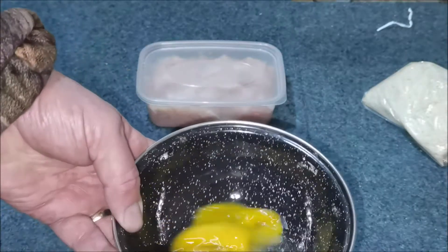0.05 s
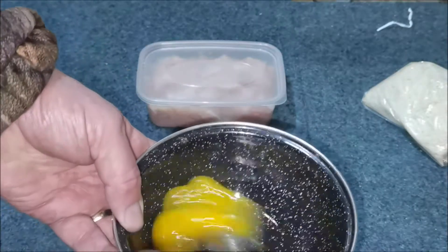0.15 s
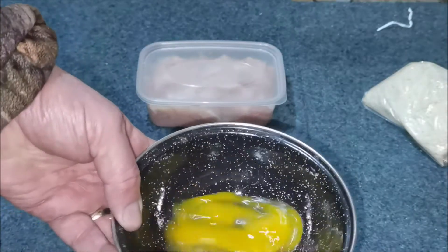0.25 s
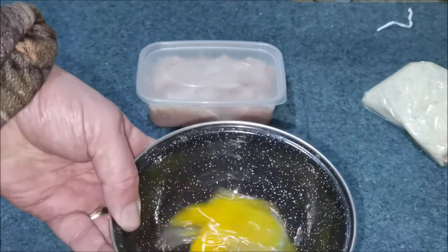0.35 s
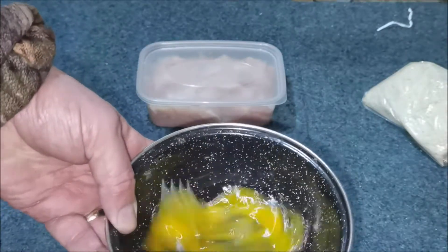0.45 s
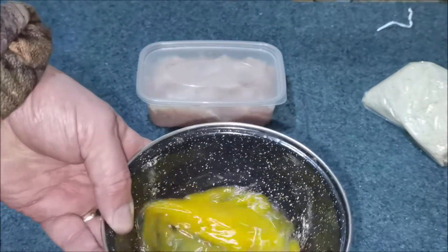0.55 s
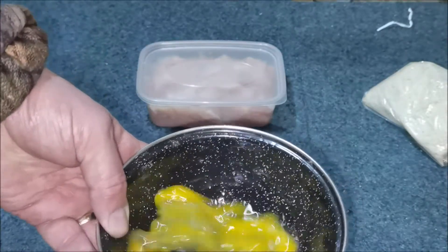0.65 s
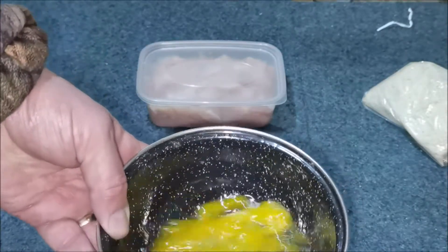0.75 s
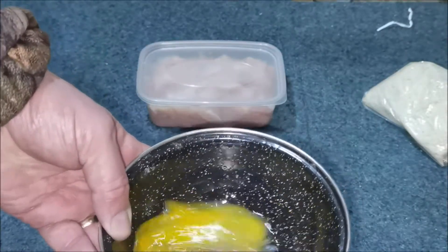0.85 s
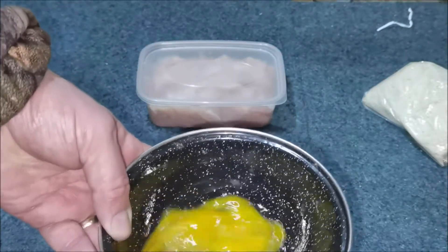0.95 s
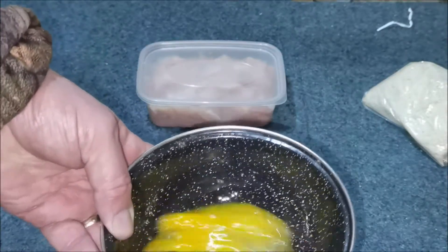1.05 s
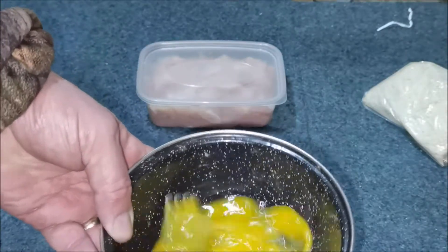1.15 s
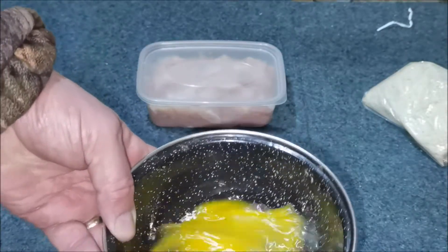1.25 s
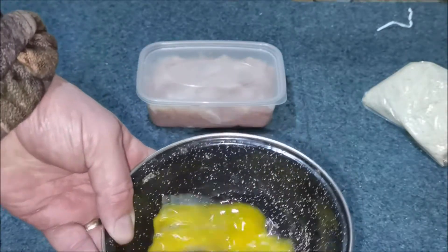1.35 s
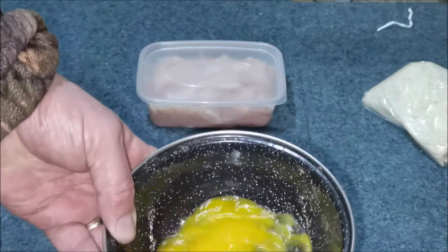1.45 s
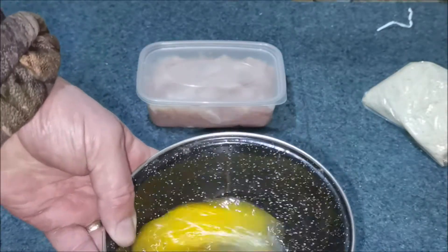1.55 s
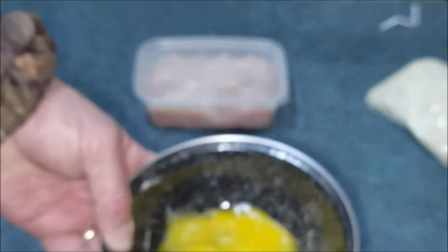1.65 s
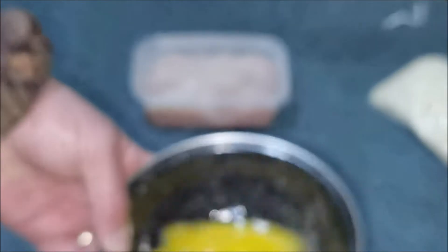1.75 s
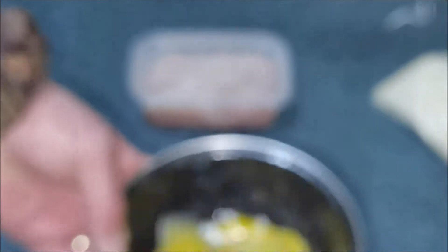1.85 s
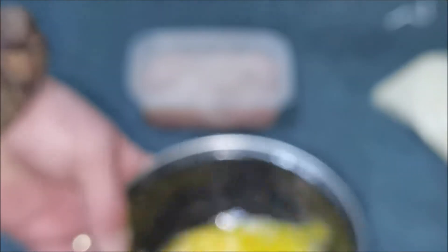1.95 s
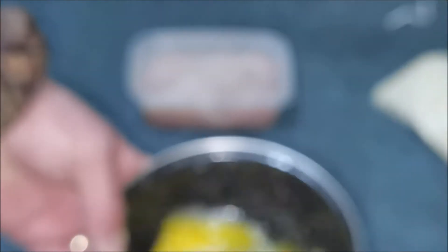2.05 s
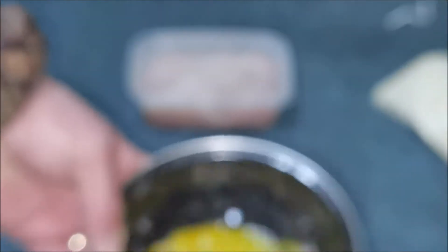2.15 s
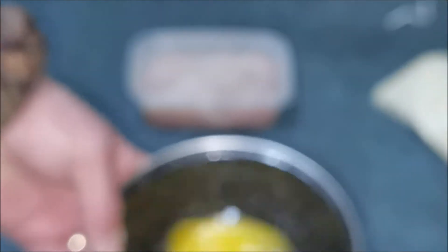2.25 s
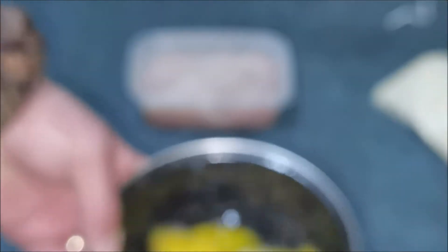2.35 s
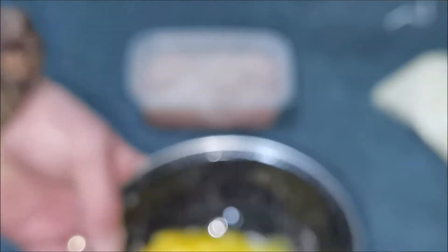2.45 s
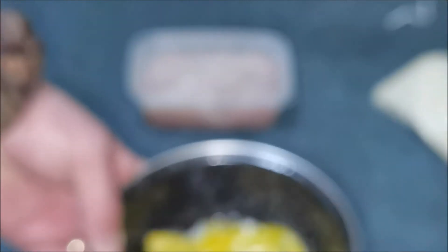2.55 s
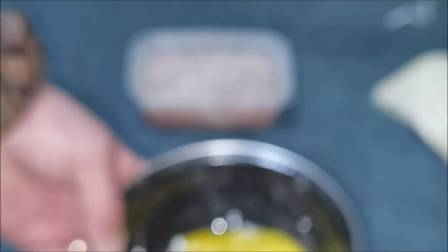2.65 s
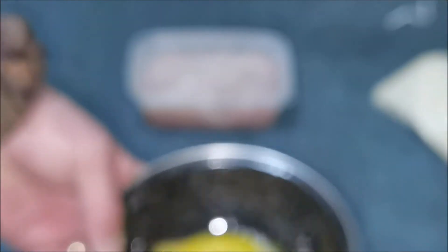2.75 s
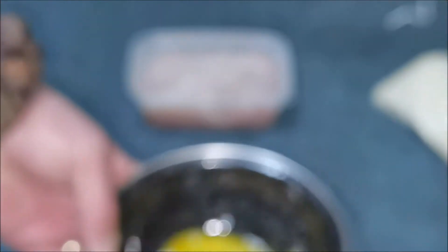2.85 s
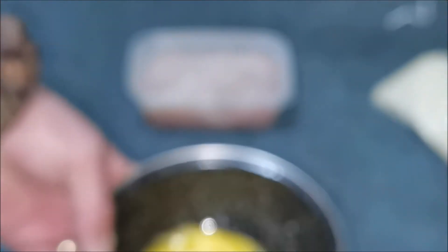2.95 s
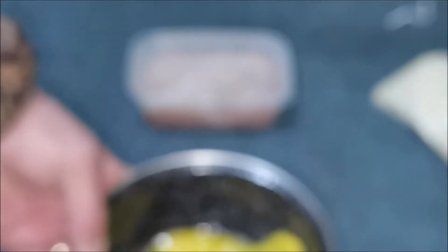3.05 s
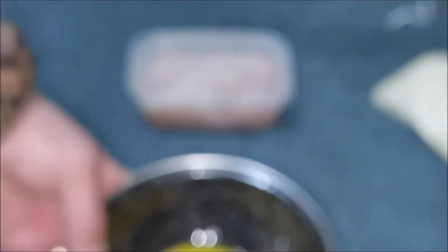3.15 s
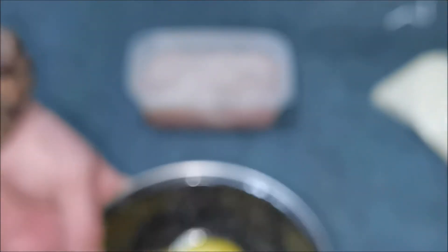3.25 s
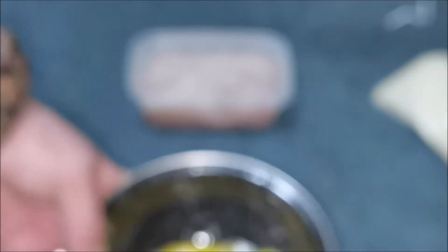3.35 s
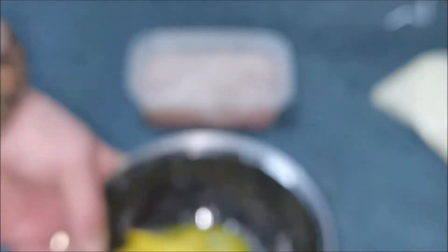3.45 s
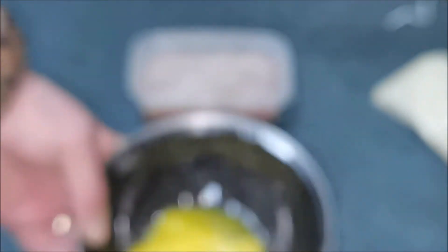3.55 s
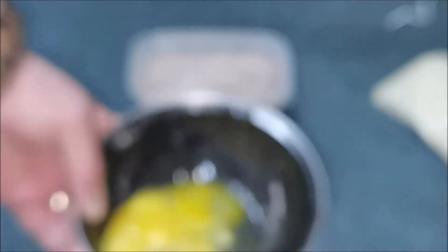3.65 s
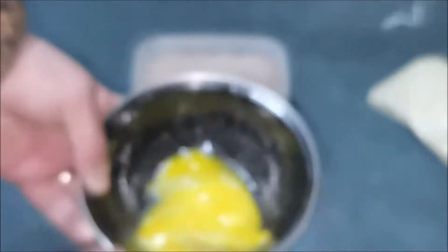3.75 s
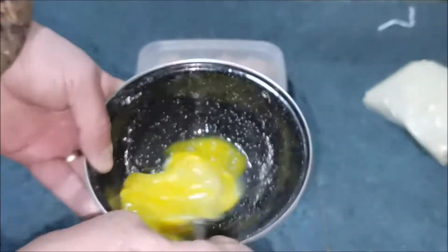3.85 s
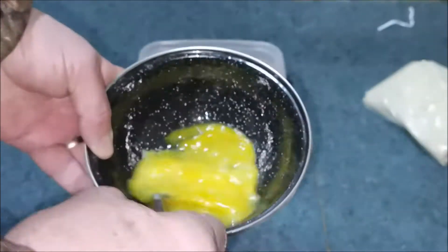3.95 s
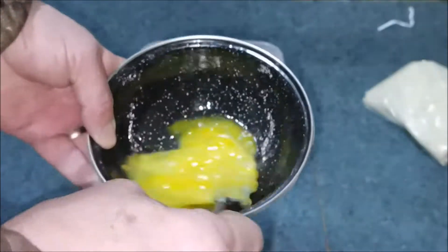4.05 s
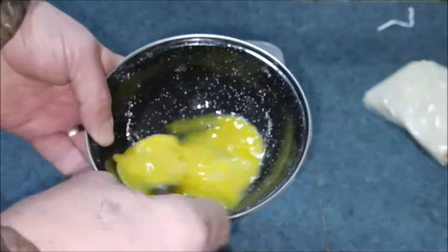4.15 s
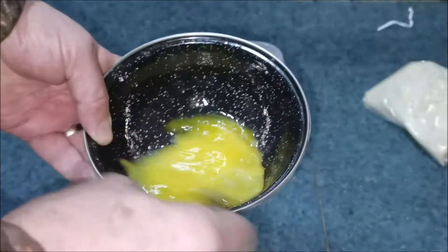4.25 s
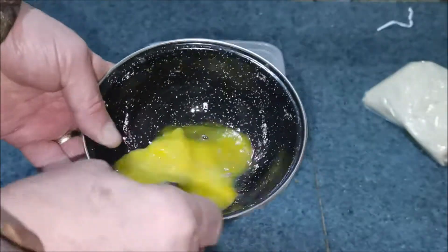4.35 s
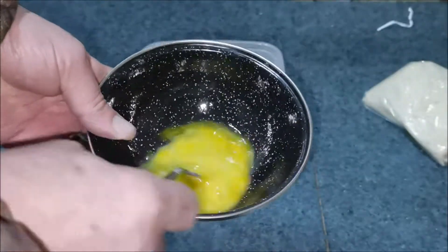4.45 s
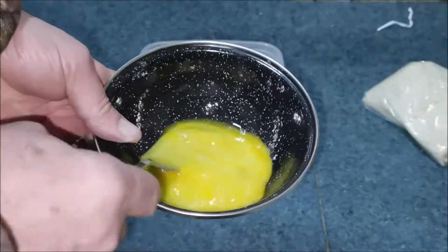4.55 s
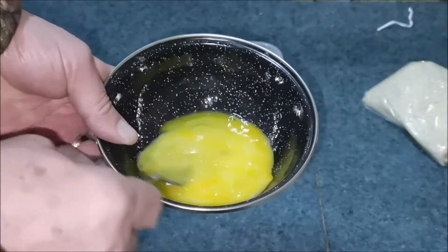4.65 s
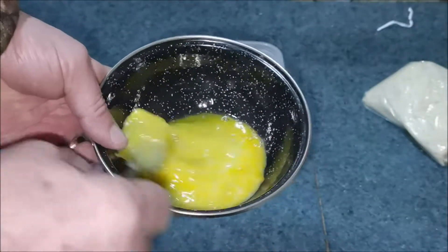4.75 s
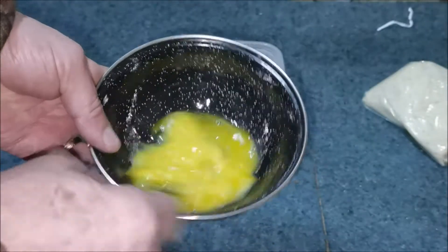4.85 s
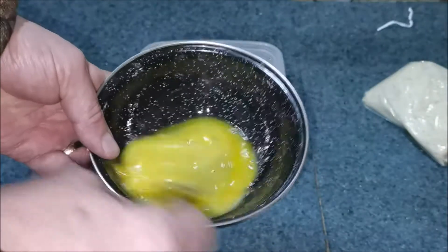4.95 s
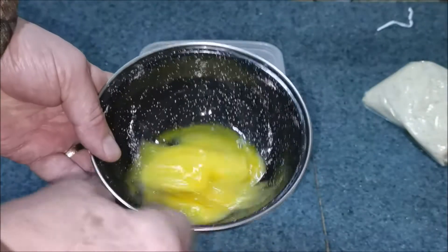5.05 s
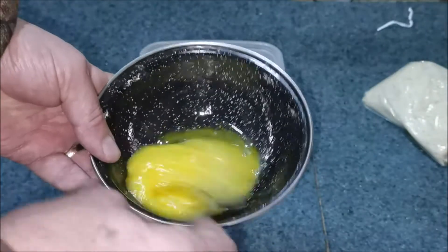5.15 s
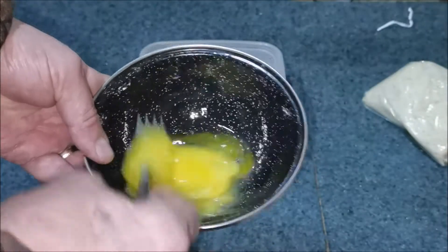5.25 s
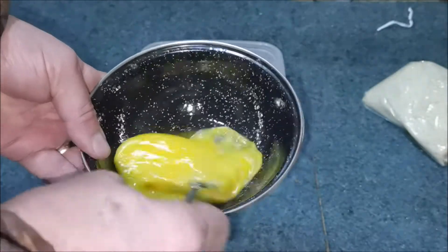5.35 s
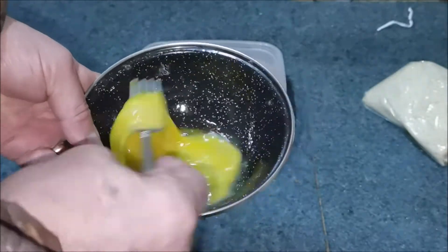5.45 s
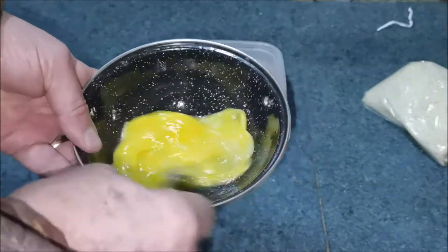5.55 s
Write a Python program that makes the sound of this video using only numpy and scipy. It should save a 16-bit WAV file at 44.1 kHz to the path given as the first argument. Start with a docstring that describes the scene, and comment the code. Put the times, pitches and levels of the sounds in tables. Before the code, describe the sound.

Close stereo pickup in a small room: a fork beats egg in a hand-held metal bowl. Crisp, damped clinks alternate between wall hits and bottom knocks, around eleven or twelve contacts per second, joined by short scrapes, faint plops and squelches. The beating stops briefly after four seconds, then resumes a little less evenly until the end. Low soft booms and dull handling rustle sit underneath.

```python
"""A fork beats an egg in a hand-held metal bowl over a table, in a small room, with one short pause.
Each turn: noise-like contact forces ring the bowl's modes as the tines hit the wall, scrape and knock below.
The egg plops, slurps and squelches: drifting bubble tones and gurgles of narrow-band noise.
Under it: a low two-tone boom, probably the table shaking; a dull rustle, echoes and steady room noise."""
import sys
import numpy as np
from scipy import signal
from scipy.fft import rfft, irfft
from scipy.io import wavfile

SR = 44100
rng = np.random.default_rng(int(sys.argv[2]) if len(sys.argv) > 2 else 0)


def wav_record(signal):
    """Record a signal, one row per channel, as 16-bit PCM in the file named by sys.argv[1]."""
    frames = np.transpose(np.atleast_2d(signal))
    bounded = np.clip(frames, -1, 1)
    # unit amplitude maps onto the largest positive 16-bit level
    quanta = np.round(bounded * 32767).astype(np.int16)
    wavfile.write(sys.argv[1], SR, quanta)


N = 246959
TIME_S = np.arange(N) / SR

# All event levels are relative: a trim or level_db in the function that sounds them is added.

# Registers of a blow: ring, thud, clank, clatter, tick. Each row: low edge in Hz, high edge in Hz.
REGISTERS_HZ = [(4800, 9000), (140, 380), (500, 1500), (1500, 4800), (9000, 16000)]
# Sound of each register. Each row: trim in dB, left over right in dB, left-right likeness 0-1, decay in s.
VOICING = [(-12.5, -1, 0.71, 0.0071), (-1.5, 1.5, 0.99, 0.0052), (-6.5, 4, 0.76, 0.005),
           (-4.5, 0.5, 0.92, 0.011), (-5, 2.5, 0.3, 0.006)]
# Modes of bowl and fork, damped by hand and egg. Each row: centre in Hz, width in Hz, gain in dB.
BOWL_MODES = [(180, 67, 1.5), (210.7, 60.5, 6.5), (334, 20.7, -3.5), (541.6, 39, -8.5), (660, 65, -9.5),
              (786, 13, -17), (944, 65, -10), (1071, 40, -7), (1330, 200, -9.5), (1906, 405, 1.5),
              (2420, 500, -1), (3365, 1380, -5.5), (4260, 570, -7.5), (5170, 120, -9.5), (5910, 140, -2.5),
              (6163, 327, 8), (6600, 170, -9), (6924, 335, 4.5), (7654, 410, 4.5), (9350, 910, -11.5),
              (10870, 990, 1.5), (12230, 680, 2), (13130, 570, 0), (14400, 420, -14)]
# Tines meet the wall, then slide down it. Each row: start in seconds, ring in dB, bite of bare metal in dB,
# clank in dB, clank pitch in Hz, rasp of the slide in dB.
WALL_HITS = [(0.193, -15, -28, -31, 1620, -44), (0.5589, -19, -49.5, -52, 1750, -45),
             (0.9019, -27, -36.5, -44, 2330, -58), (1.236, -13.5, -37.5, -67, 1950, -31.5),
             (1.5863, -13.5, -37.5, -54, 2300, -30.5), (1.7585, -23.5, -39, -61, 1580, -45),
             (1.938, -32, -46, -48, 1590, -29), (2.101, -8.5, -30.5, -35, 1600, -29.5),
             (2.277, -12, -31, -52, 2250, -29), (2.4494, -22, -43.5, -52, 1050, -40.5),
             (2.6267, -16, -47, -25.5, 1270, -50), (2.803, -11, -40.5, -22.5, 1214, -30.5),
             (2.9707, -9, -34.5, -18.5, 1200, -29), (3.155, -28.5, -45, -71, 1860, -32),
             (3.324, -15.5, -25, -30.5, 2140, -24), (3.5062, -21, -38, -43, 2020, -31.5),
             (3.6777, -7, -22.5, -23, 1330, -31), (3.8639, -34, -42.5, -59, 1300, -37.5),
             (4.047, -31, -42.5, -57, 1860, -38), (4.192, -7.5, -20.5, -34.5, 2000, -30.5),
             (4.657, -21.5, -28.5, -24, 659, -29), (4.8389, -11.5, -22.5, -23, 1910, -39),
             (4.98, -19, -33.5, -40.5, 1900, -32.5), (5.1397, -22, -39.5, -63, 1310, -34),
             (5.312, -52, -48, -45, 810, -35), (5.501, -29, -35, -38.5, 2670, -30)]
# Fork knocks on the bottom at the end of a turn. Each row: start in seconds, ring in dB, ring pitch in Hz,
# bite of bare metal in dB, clatter in dB.
KNOCKS = [(0.0816, -23.5, 5800, -22.5, -42), (0.252, -11.5, 5870, -22, -36.5),
          (0.4265, -11, 6220, -22.5, -33), (0.5956, -9.5, 5820, -28, -36), (0.771, -14.5, 5850, -23, -34),
          (0.9457, -12.5, 6000, -28.5, -37.5), (1.12, -13.5, 6550, -23, -30.5),
          (1.296, -16, 6600, -27, -27.5), (1.4642, -14.5, 5800, -21.5, -32), (1.6365, -12, 6130, -25, -34),
          (1.8192, -15.5, 6160, -24, -30.5), (1.9897, -17.5, 7400, -25.5, -31.5),
          (2.168, -14, 6070, -29.5, -31), (2.3333, -12.5, 6660, -27, -32.5),
          (2.506, -13.5, 6000, -24, -28.5), (2.6807, -12.5, 5400, -22.5, -32),
          (2.8559, -12.5, 6020, -25.5, -32), (3.036, -12.5, 8000, -22.5, -35),
          (3.2059, -12.5, 6030, -25, -30.5), (3.3862, -10.5, 6930, -25, -28.5),
          (3.562, -14, 7450, -26.5, -26.5), (3.7493, -18, 6150, -29.5, -31.5),
          (3.9234, -19.5, 6500, -33.5, -39), (4.0877, -19, 7200, -32.5, -41),
          (4.2589, -12.5, 7500, -36, -35), (5.0236, -15, 7000, -27, -33.5),
          (5.1993, -17.5, 5970, -25.5, -30.5), (5.3657, -19.5, 5800, -31, -34),
          (5.5476, -18.5, 6900, -32.5, -34.5)]
# Light extra touches of a tine, most of them during a slide. Each row: start in seconds, ring in dB.
TOUCHES = [(0.041, -34), (0.222, -27), (0.5805, -23), (0.9191, -19.5), (1.254, -20.5), (1.409, -35),
           (1.7907, -20.5), (2.4825, -21), (4.2023, -23)]
# Other registers of a touch, relative to its ring: thud, clank, clatter, tick, each in dB.
TOUCH_COLOUR_DB = (-26, -38, -28, -23)
# Air pockets closing in the egg, and pitched knocks of some wall hits.
# Each row: start in seconds, level in dB, pitch in Hz.
PLOPS = [(0.1489, -26.5, 2080), (0.194, -22.5, 1647), (0.453, -44, 1090), (0.7534, -32.5, 1337),
         (1.384, -36, 1277), (1.6372, -29, 1580), (1.763, -36, 1510), (1.8924, -33, 1290),
         (1.9658, -30.5, 1554), (2.004, -35, 957), (2.0968, -44, 1530), (2.4256, -40.5, 1094),
         (3.1361, -35.5, 1830), (3.4186, -41, 1200), (3.4955, -43, 2000), (3.603, -35.5, 1204),
         (3.729, -25, 1300), (4.602, -50.5, 1500), (5.1394, -23.5, 1257), (5.324, -41, 1780),
         (5.36, -38.5, 1085)]
# Wet sounds between the blows. Each row: time in seconds, level in dB.
CHURN = [(0.0, -61), (0.28, -79), (0.56, -67), (1.31, -56.5), (3.65, -54.5), (4.59, -61), (4.88, -49.5),
         (5.6, -55)]
# Lead of left over right for sound from the bowl. Each row: frequency in Hz, phase in radians.
LEFT_LEAD = [(0, 0.49), (1000, 0.014), (3000, 1.2), (6500, 1.38), (8000, 2), (15000, 1.2)]
# Decay of the echo. Each row: frequency in Hz, T60 in seconds.
ROOM_T60 = [(150, 0.06), (400, 0.45), (1000, 0.15), (2800, 0.28), (7000, 0.296), (14000, 0.12)]
# Strength of the echo. Each row: frequency in Hz, level in dB.
ROOM_LEVEL = [(200, -2.5), (800, -7), (2500, -2.5), (7000, -5), (14000, -4)]
# Swells of the low boom. Each row: start in seconds, length in seconds, peak in dB.
BOOMS = [(0.443, 0.2, -34.5), (1.272, 0.21, -28), (1.585, 0.076, -37.5), (1.864, 0.13, -29),
         (2.424, 0.25, -34), (2.969, 0.28, -32), (3.543, .23, -30), (3.843, 0.18, -40.5),
         (4.895, 0.22, -29), (5.49, 0.16, -25.5)]
# Low rustle of hands and bowl. Each row: time in seconds, level in dB.
HANDLING = [(0.0, -44), (0.34, -60), (1.2, -52), (1.39, -53.5), (1.78, -42), (2.63, -48.5), (2.84, -56.5),
            (3.18, -50.5), (3.37, -54), (3.79, -46.5), (3.91, -56.5), (4.65, -48), (5.01, -48),
            (5.6, -41.5)]
# Spectrum of that rustle. Each row: frequency in Hz, relative density in dB.
HANDLING_COLOUR = [(20, -8.5), (55, 3.5), (90, 8.5), (130, -13.5), (300, -5.5), (420, -13), (800, -28.5),
                   (2000, -69)]
# Spectrum of the quiet room. Each row: frequency in Hz, relative density in dB.
FLOOR_COLOUR = [(25, -12), (55, -23), (150, -34), (330, -14), (750, -17), (1700, -15), (4000, -16),
                (6300, -10.5), (9000, -18.5), (15000, -24)]

# Modes favoured by a wall hit (scatter is log-normal), a knock and a touch.
WALL_RING_HZ, WALL_RING_SCATTER = 6260, 0.075
KNOCK_CLANK_DB, KNOCK_CLATTER_HZ = -41.5, 2304
TOUCH_RING_HZ, TOUCH_CLATTER_HZ = 6550, 1700
# Thud grows slowly with bite (wall) or clatter (knock).
WALL_THUD_DB, KNOCK_THUD_DB, USUAL_CLATTER_DB, THUD_DB_PER_DB = -44, -36, -32.5, 0.22
# Tines brush the wall just before a hit; level relative to its ring.
APPROACH_S, APPROACH_DB = 0.011, -32.5
# Slide: starts this long after the hit, ends at the knock or this long after the hit.
SLIDE_LAG_S, LONGEST_SLIDE_S = 0.0069, 0.06
# A firm hit or a hard slide also grinds the low modes, more so for a low clank.
GRIND_PER_CLANK_DB, GRIND_PER_RASP_DB = -17, -19
GRIND_BELOW_HZ, GRIND_DB_PER_OCTAVE = 1070, 11
# After a knock the fork drags on over the bottom; grind is relative to the rasp.
FOLLOW_THROUGH_S, FOLLOW_THROUGH_DB, FOLLOW_GRIND_DB = 0.045, -41, -12
# In the pause the fork glides lightly through the egg.
STIR_AT_S, STIR_S, STIR_DB = 4.32, 0.3, -56
# Hand effort peaks this long before a knock; PUSH_S is the half-width at 1/e.
PUSH_LEAD_S, PUSH_S = 0.031, 0.042
BOOM_HZ, BOOM_SKEW = 74.7, 0.72  # skew under 1: a swell rises faster than it falls
FLOOR_DB, EDGE_HZ = -55.5, 15400


def amp(db):
    """dB to gain."""
    return 10 ** (np.asarray(db) / 20)


def evened(x):
    """Scales to unit RMS."""
    return x / np.sqrt(np.mean(x ** 2) + 1e-20)


def read(points, hz):
    """Interpolates a spectrum linearly over log frequency."""
    f, value = np.transpose(points)
    return np.interp(np.log(hz + 1), np.log(f + 1), value)


def level_at(points):
    """Interpolates a level in dB over time."""
    return np.interp(TIME_S, *np.transpose(points))


def add(mix, start_s, sound):
    """Mixes a sound in at start_s."""
    part = mix[:, max(round(start_s * SR), 0):][:, :sound.shape[-1]]
    part += sound[..., :part.shape[1]]


def bandpass(lo_hz, hi_hz, order):
    """Butterworth band-pass sections."""
    return signal.butter(order, [lo_hz, min(hi_hz, SR / 2 - 1)], "band", fs=SR, output="sos")


def band(x, lo_hz, hi_hz, order=3):
    """Causal band-pass."""
    return signal.sosfilt(bandpass(lo_hz, hi_hz, order), x)


def register(x, lo_hz, hi_hz):
    """Zero-delay band-pass with soft edges."""
    f = np.fft.rfftfreq(x.shape[-1], 1 / SR)
    gain = abs(signal.sosfreqz(bandpass(lo_hz, hi_hz, 3), f, fs=SR)[1])
    return irfft(rfft(x) * gain, x.shape[-1])


def pair(z, likeness):
    """Turns two unrelated signals into a partly alike left and right."""
    c = np.clip(likeness, 0, 1)
    return np.array([z[0], c * z[0] + np.sqrt(1 - c * c) * z[1]])


def noise(colour, likeness):
    """Steady stereo noise of a given spectrum, unit RMS."""
    z = rfft(pair(rng.standard_normal((2, N)), likeness))
    return evened(irfft(z * amp(read(colour, np.fft.rfftfreq(N, 1 / SR))), N))


def resonate(x, hz, width_hz):
    """One damped mode driven by a force."""
    return signal.lfilter(*signal.iirpeak(hz, hz / width_hz, fs=SR), x)


def bowl(x, uneven_db=0):
    """A contact force rings all modes, each more or less as the point of contact changes."""
    shares_db = uneven_db * rng.standard_normal((len(BOWL_MODES),) + x.shape[1:-1] + (1,))
    return sum(amp(db + share_db) * resonate(x, hz, width_hz)
               for (hz, width_hz, db), share_db in zip(BOWL_MODES, shares_db))


def contacts():
    """Every blow: (s, ring, thud, clank, clatter, tick dB, high mode Hz, low mode Hz), by where it lands."""
    def heavier_db(clatter_db):
        """Extra thud of a louder contact."""
        return THUD_DB_PER_DB * (clatter_db - USUAL_CLATTER_DB)

    ring_hz = WALL_RING_HZ * np.exp(WALL_RING_SCATTER * rng.standard_normal(len(WALL_HITS)))
    walls = [(s, ring, WALL_THUD_DB + heavier_db(bite), clank, bite, bite, high_hz, clank_hz)
             for (s, ring, bite, clank, clank_hz, _), high_hz in zip(WALL_HITS, ring_hz)]
    knocks = [(s, ring, KNOCK_THUD_DB + heavier_db(clatter), KNOCK_CLANK_DB, clatter, bite, hz,
               KNOCK_CLATTER_HZ) for s, ring, hz, bite, clatter in KNOCKS]
    touches = [(s, ring, *(ring + np.array(TOUCH_COLOUR_DB)), TOUCH_RING_HZ, TOUCH_CLATTER_HZ)
               for s, ring in TOUCHES]
    return walls + knocks + touches


def blows(crack_db=6.5, crack_s=0.00031, high_db=3, low_db=6, sharpness=22, rise_s=0.00046,
          halo_db=-15, halo_s=0.0038, bounce_s=0.00493, bounce_db=-3, uneven_db=4.5):
    """The fork cracks home, bounces and chatters: noise bursts ring the modes, register by register."""
    starts_s, *levels_db, high_hz, low_hz = np.transpose(contacts())
    lead_s, head_s = 0.012, 0.02
    t = np.arange(4096) / SR - lead_s
    after = np.maximum(t, 0)
    bounce_at_s = bounce_s * rng.uniform(0.28, 1.663, (len(starts_s), 1))
    crack = amp(crack_db) * np.exp(-after / crack_s)
    bounce = amp(bounce_db) * np.exp(-abs(t - bounce_at_s) / crack_s)
    halo = amp(halo_db) * np.exp(-abs(t) / halo_s)  # soft noise swells and fades around each crack
    onset = 1 - np.exp(-after / rise_s)
    chatter = rng.standard_normal((len(starts_s), 2, len(t))).swapaxes(0, 1)
    head = (t > 0) & (t < head_s)
    sounds = 0
    for (lo, hi), (trim_db, side_db, likeness, die_s), db in zip(REGISTERS_HZ, VOICING, levels_db):
        force = halo + (np.exp(-after / die_s) + crack + bounce) * onset
        part = bowl(pair(chatter, likeness) * force, uneven_db)
        # the spot struck favours two modes
        for favoured_hz, boost_db in ((high_hz, high_db), (low_hz, low_db)):
            for k in np.flatnonzero((lo < favoured_hz) & (favoured_hz < hi)):
                hz = favoured_hz[k]
                part[:, k] += amp(boost_db) * resonate(part[:, k], hz, hz / sharpness)
        part = register(part, lo, hi)
        part /= np.sqrt(np.mean(part[..., head] ** 2, axis=2, keepdims=True))
        sides = amp([side_db / 2, -side_db / 2])[:, None, None]
        sounds = sounds + part * amp(db + trim_db)[:, None] * sides
    out = np.zeros((2, N))
    for k, start_s in enumerate(starts_s):
        add(out, start_s - lead_s, sounds[:, k])
    return out


def slides():
    """Every slide as (start s, length s, rasp gain, grind gain): brush, slide, follow-through, stir."""
    for s, ring_db, _, clank_db, clank_hz, rasp_db in WALL_HITS:
        length_s = min([LONGEST_SLIDE_S] + [knock - s for knock, *_ in KNOCKS if knock > s])
        octaves_below = max(np.log2(GRIND_BELOW_HZ / clank_hz), 0)
        hit_grind_db = clank_db + GRIND_PER_CLANK_DB + GRIND_DB_PER_OCTAVE * octaves_below
        grind = amp(hit_grind_db) + amp(rasp_db + GRIND_PER_RASP_DB)
        yield s - APPROACH_S, APPROACH_S, amp(ring_db + APPROACH_DB), 0
        yield s + SLIDE_LAG_S, length_s - SLIDE_LAG_S, amp(rasp_db), grind
    for s, *_ in KNOCKS:
        yield s, FOLLOW_THROUGH_S, amp(FOLLOW_THROUGH_DB), amp(FOLLOW_THROUGH_DB + FOLLOW_GRIND_DB)
    yield STIR_AT_S, STIR_S, amp(STIR_DB), amp(STIR_DB + FOLLOW_GRIND_DB)


def scrapes(slips_per_s=450, spread_db=3.5, hiss=0.79, low_hz=3000, top_hz=11500, bright_db=-13,
            level_db=-3, grind_lo_hz=480, grind_hi_hz=1150, snap_db=-7, snaps_per_s=260, swell_db=3):
    """Tines stick and slip: tiny uneven clicks that rasp, and under more pressure grind the low modes."""
    pressure = np.zeros((2, N))  # rows: rasp, grind
    for start_s, length_s, rasping, grinding in slides():
        stroke = signal.windows.tukey(max(round(length_s * SR), 2), 0.3)
        # the rasp swells as the fork gathers speed
        speeding = amp(swell_db * np.linspace(-0.5, 0.5, len(stroke)))
        easing = np.linspace(1.4, 0.5, len(stroke))
        add(pressure, start_s, stroke * np.array([rasping * speeding, grinding * easing]))
    slip_gain = amp(spread_db * np.minimum(rng.exponential(1, N), 2))
    slips = (rng.random(N) < slips_per_s / SR) * slip_gain
    grit = signal.lfilter([1], [1, -0.93], slips)
    force = (grit + hiss) * pair(rng.standard_normal((2, N)), 0.72)
    wall = bowl(force)
    rasp = evened(band(wall, low_hz, top_hz, order=1) + amp(bright_db) * band(force, 8400, 24000))
    grind = evened(band(wall, grind_lo_hz, grind_hi_hz, order=2))
    # tine tips snap free with thin ticks
    tips = (rng.random(N) < snaps_per_s / SR) * rng.random(N)
    ticks = signal.lfilter([1], [1, -0.93], tips) * rng.standard_normal((2, N))
    snaps = evened(band(ticks, 6500, 15000, order=2))
    return amp(level_db) * (pressure[0] * (rasp + amp(snap_db) * snaps) + pressure[1] * grind)


def bubble(hz, cycles, glide):
    """A pocket of air rings briefly while its pitch drifts up."""
    t = np.arange(2048) / SR
    age = t * hz / cycles
    tone = np.sin(2 * np.pi * hz * t * (1 + glide * np.minimum(age, 4)))
    wave = tone * np.exp(-age) * (1 - np.exp(-4 * age))
    return wave / abs(wave).max()


def plops(level_db=2.0, cycles=6, glide=0.025, splash=0.29, splash_s=0.0058):
    """Closing air pockets, and the pitched knock of some wall hits: a short gliding tone plus a noise smack."""
    out = np.zeros((2, N))
    for s, db, hz in PLOPS:
        ring = bubble(hz, cycles, glide)
        wet = evened(band(rng.standard_normal(len(ring)), hz * 0.79, hz * 2.3, order=2))
        smack = wet * np.exp(-TIME_S[:len(ring)] / splash_s)
        add(out, s, amp(db + level_db) * (ring + splash * smack))
    return out * amp([[1], [-1]])  # 2 dB to the left


def slurps(level_db=-1, start_hz=1250, scatter=0.13, rise_per_s=3, rise_scatter_per_s=4, width_hz=130,
           length_s=0.046, lag_s=0.023):
    """The furrow behind each hit and knock closes: a gurgle that mostly rises as the hollow shrinks."""
    out = np.zeros((2, N))
    t = np.arange(0, length_s, 1 / SR)
    r = np.exp(-np.pi * width_hz / SR)
    for s, *_ in [*WALL_HITS, *KNOCKS]:
        rise = rise_per_s + rise_scatter_per_s * rng.standard_normal()
        hz = start_hz * np.exp(scatter * rng.standard_normal() + rise * t)
        z = rng.standard_normal(len(t)) + 1j * rng.standard_normal(len(t))
        flutter = signal.lfilter([1 - r], [1, -r], z)
        gurgle = (flutter * np.exp(2j * np.pi * np.cumsum(hz) / SR)).real
        add(out, s + lag_s, evened(gurgle * np.sin(np.pi * t / length_s)))
    return out * amp(level_db + level_at(CHURN))


def pushes(rest):
    """Effort of the hand: a swell before each knock, over a constant share."""
    return rest + sum(np.exp(-((TIME_S - s + PUSH_LEAD_S) / PUSH_S) ** 2) for s, *_ in KNOCKS)


def squelch(level_db=-4, per_s=150, spread_db=4.0, cycles=5.5, low_hz=1050, high_hz=2900, rest=0.75,
            count=20):
    """Many small bubbles at random instants, as loud as the egg is churned."""
    out = np.zeros((2, N))
    for hz in np.geomspace(low_hz, high_hz, count):
        pop_gain = amp(spread_db * np.minimum(rng.exponential(1, N), 3))
        pops = (rng.random(N) < per_s / count / SR) * pop_gain
        sides = amp(rng.normal(0, 3.8, (2, 1)))
        out += sides * signal.oaconvolve(pops, bubble(hz, cycles, 0.081))[:N]
    return evened(out) * pushes(rest) * amp(level_db + level_at(CHURN))


def shaking():
    """Envelope of the low boom: one lopsided arch per swell."""
    return sum(amp(db) * np.sin(np.pi * np.clip((TIME_S - s) / length_s, 0, 1) ** BOOM_SKEW)
               for s, length_s, db in BOOMS)


def booms(level_db=2.0, waver=0.0446, upper_hz=97, upper_db=-13, shudder=0.28, shudders_per_s=45):
    """Two low tones swell, beat and die, with random drift in pitch and shudder in level."""
    knots_s = np.arange(0, N / SR, 1 / shudders_per_s)
    drift, push = (np.interp(TIME_S, knots_s, z) for z in rng.standard_normal((2, len(knots_s))))
    phase_per_hz = 2 * np.pi * np.cumsum(1 + waver * drift) / SR
    wave = np.sin(BOOM_HZ * phase_per_hz) + amp(upper_db) * np.sin(upper_hz * phase_per_hz)
    return amp(level_db) * shaking() * (1 + shudder * push) * wave


def handling(level_db=-3, rest=0.95):
    """Dull noise of the held bowl and sloshing egg, rising with each push of the fork."""
    return noise(HANDLING_COLOUR, 0.89) * pushes(rest) * amp(level_db + level_at(HANDLING))


def room(x, gap_s=0.002, shift_s=0.17, alike_hz=700, count=5):
    """Dense echo, each band dying at its own speed; several random patterns crossfade in steady rotation."""
    out = np.zeros((2, N))
    for k in range(count):
        taps = rng.standard_normal((2, SR // 2)) * (TIME_S[:SR // 2] > gap_s) / np.sqrt(SR)
        hz, t, z = signal.stft(taps, SR, nperseg=256)
        z = pair(z, 1 / (1 + (hz[:, None] / alike_hz) ** 2))  # long waves reach both sides alike
        t60_s = read(ROOM_T60, hz)[:, None]
        decay = 1000 ** (-t / t60_s) * np.sqrt(2 * np.log(1000) / t60_s)  # scaled to even out the energy
        z = z * decay * amp(read(ROOM_LEVEL, hz))[:, None]
        echo = signal.istft(z, SR, nperseg=256)[1]
        share = np.sin(np.pi / 2 * np.minimum((TIME_S / shift_s - k) % count, 2))
        out += signal.oaconvolve(x * share, echo, axes=1)[:, :N]
    return out


def room_floor():
    """Steady noise of the quiet room."""
    return amp(FLOOR_DB) * noise(FLOOR_COLOUR, 0.2)


def scene():
    """Bowl and egg with the left leading, their echo, then boom, rustle and room noise."""
    near = blows() + scrapes() + plops() + squelch() + slurps()
    lag = np.exp(-1j * read(LEFT_LEAD, np.fft.rfftfreq(N, 1 / SR)))
    near[1] = irfft(rfft(near[1]) * lag, N)
    return near + room(near) + booms() + handling() + room_floor()


def record(dry):
    """Linear-phase low-pass at EDGE_HZ."""
    lowpass = signal.firwin(141, EDGE_HZ, window=("kaiser", 10), fs=SR)
    return signal.oaconvolve(dry, lowpass[None], "same")


dry = scene()
out = record(dry)
wav_record(out)
```